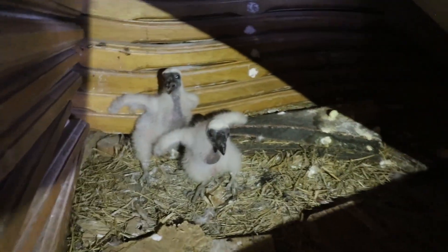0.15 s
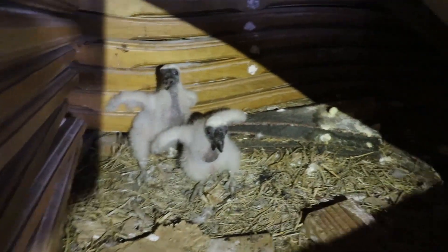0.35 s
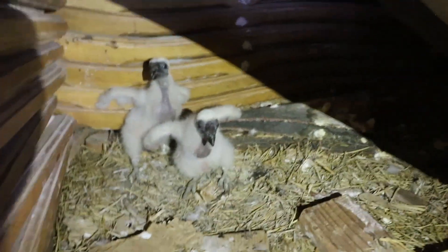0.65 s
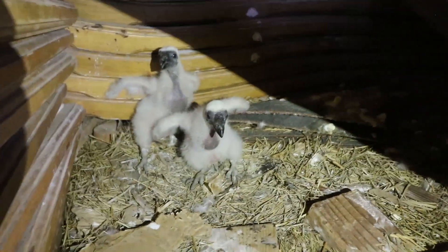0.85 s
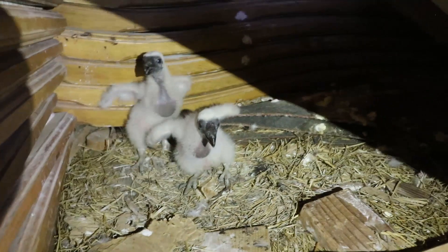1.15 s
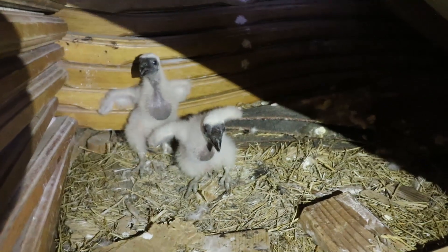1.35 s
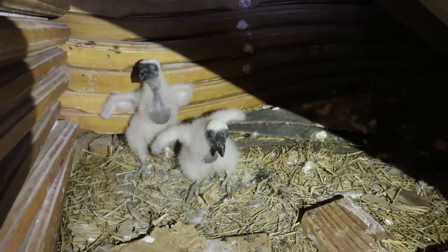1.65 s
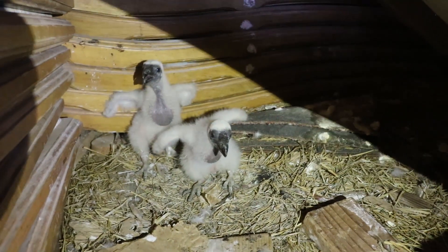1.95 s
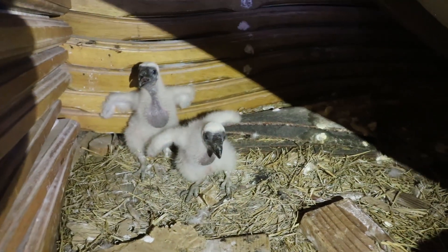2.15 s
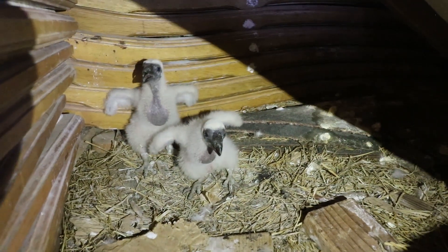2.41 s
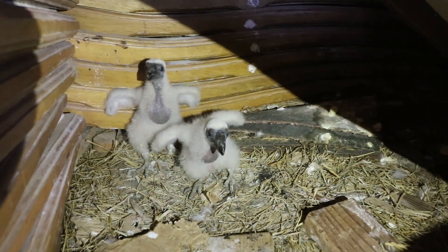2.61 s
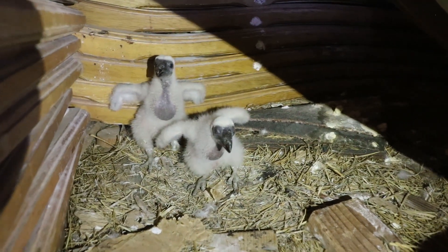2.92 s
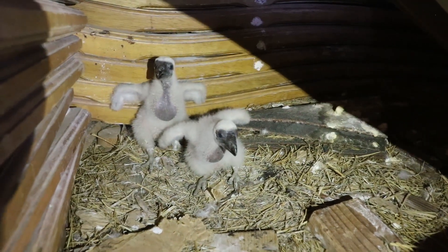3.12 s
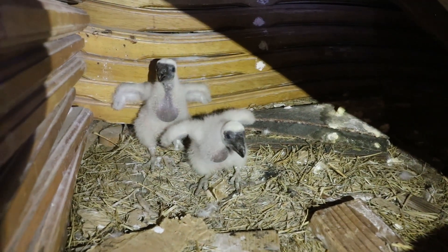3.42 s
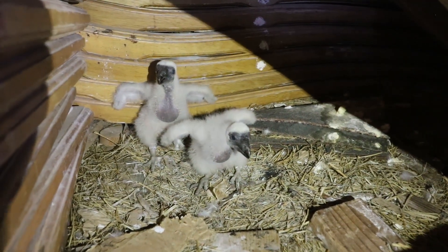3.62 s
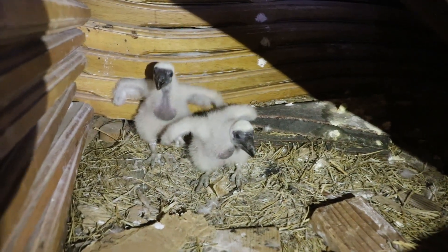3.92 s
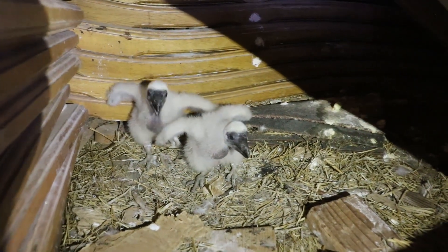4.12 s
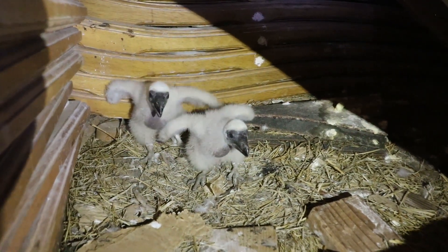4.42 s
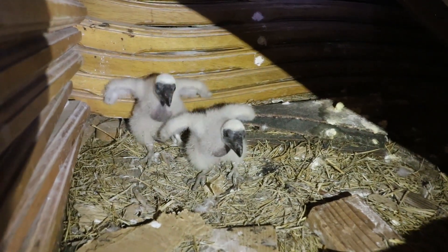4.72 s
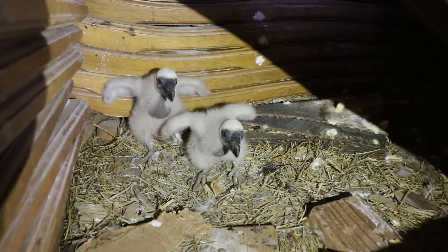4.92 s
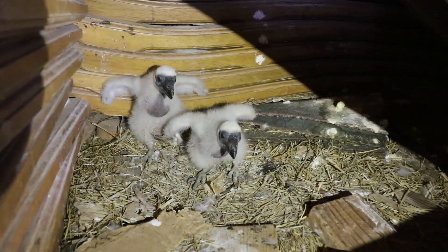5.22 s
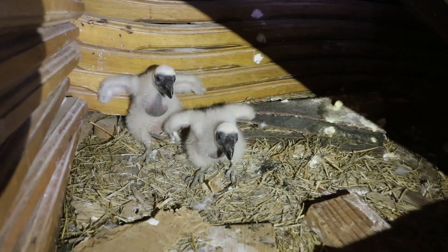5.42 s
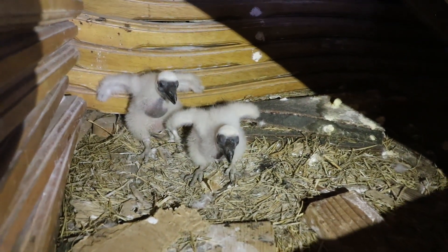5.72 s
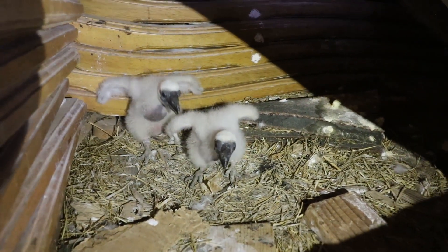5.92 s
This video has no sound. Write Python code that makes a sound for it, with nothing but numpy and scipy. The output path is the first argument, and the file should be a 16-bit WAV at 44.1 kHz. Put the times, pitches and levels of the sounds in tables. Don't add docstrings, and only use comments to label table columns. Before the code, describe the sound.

Long, raspy, airy hisses alternate between two young vultures, one softer and one stronger, over faint air noise, distant engine rumble and a few taps.

```python
import sys
import numpy as np
from scipy import signal
from scipy.fft import rfft, irfft, next_fast_len
from scipy.io import wavfile
from scipy.ndimage import map_coordinates

SR = 44100
rng = np.random.default_rng(int(sys.argv[2]) if len(sys.argv) > 2 else 0)


def voltage_ratio(decibels):
    exponent = np.asarray(decibels, float) / 20
    return 10 ** exponent


def bounce(signal):
    frames = np.transpose(np.atleast_2d(signal))
    limited = np.clip(frames, -1, 1)
    pcm = np.round(limited * 32767).astype(np.int16)
    wavfile.write(sys.argv[1], SR, pcm)


N = 266893

# (start [s], end [s], swell to full flow [s], fade at the end [s], beak jet [dB])
REAR_BREATHS = [
    (-.3, 1.136, 0.54, 0.59, -29.5),
    (1.62, 3.286, 0.76, 0.65, -29.5),
    (3.974, 5.33, 0.63, 0.53, -33.5),
]
FRONT_BREATHS = [
    (.585, 1.935, 0.65, 0.28, -24.5),
    (2.586, 3.986, 0.64, 0.21, -22),
    (4.699, 5.962, 0.58, 0.18, -23),
]
REAR_HABIT = dict(ease=1.37, tire_db_per_s=-2, pipe_db=-33.5, full_db=-27, pipe_power=0.53, shut_throat=0.87)
FRONT_HABIT = dict(ease=0.71, tire_db_per_s=3, pipe_db=-31, full_db=-20, pipe_power=0.24, shut_throat=0.6)
# (turn starts [s], turn ends [s], right ear lag [samples],
# rasp [0-1], throat size [about 1])
TURNS = [
    (.1, .5, -0.56, 0.8, 0.94),
    (2.049, 2.5, 0.15, 0.7, 0.97),
    (4.19, 4.6, -0.86, 0.84, 1.01),
    (1.122, 1.502, 0.94, 0.84, 0.95),
    (3.055, 3.807, 0.81, 0.69, 1),
    (5.2, 5.852, 0.73, 0.7, 0.99),
]
# (pitch [Hz], width [Hz], left [dB], right [dB])
REAR_PIPE = [
    [(424, 106, -1.5, -1), (750, 300, -1.5, 0), (1144, 192, 0.5, -1)],
    [(414, 128, -3.5, -1.5), (730, 450, 0, 0), (1122, 263, 0, -1)],
]
BOWED_PIPE = [
    [(407, 166, 6.2, 5.5), (675, 550, 1.9, 2.3), (1070, 234, 3.8, 4.6)],
    [(486, 240, 2.8, 2.8), (765, 530, 3.4, 3.7), (1084, 366, 1.9, 1.9)],
]
FRONT_PIPE = [
    [(431, 101, 0.5, 0.1), (786, 1010, -6.5, -5), (1277, 145, -1, -0.4)],
    [(430, 174, -0.5, 0.71), (735, 815, -4.5, -2.2), (1264, 140, -0.2, 0.54)],
]
# (pitch [Hz], width [Hz], left [dB], right [dB])
REAR_POSE_1 = [
    [(1800, 99, -24.5, -4), (2160, 3200, -33, -7), (3520, 1100, -4, 2.5), (4500, 530, -9, 0),
     (5830, 620, -2, -2), (6700, 660, 3.5, 2), (9230, 4300, -5.5, -7), (10100, 490, -12, -30),
     (10930, 503, -14.5, 4.5), (10860, 590, -3.5, 6), (12200, 680, -4, -8), (14160, 3200, -18, -19),
     (15390, 310, -13, -22)],
    [(1810, 70, -36, -25), (2140, 4400, -18, -9), (3420, 600, 0, 4), (4500, 390, -7, -1),
     (5530, 870, -1, -2), (6540, 390, 4, 3.5), (8500, 1200, -2.5, -3), (9770, 370, -9, -33),
     (10590, 830, 1, 2.5), (10620, 960, 2.5, 4), (11800, 620, 2, -3), (12430, 2770, -6.5, -12),
     (15430, 190, -3, -10.5)],
]
REAR_POSE_2 = [
    [(2340, 250, -30, -10), (3130, 730, 4.5, -15), (3280, 1000, 6.5, 2), (4920, 1670, 6.5, 6),
     (5190, 1430, 7.5, 4), (6860, 540, 4.5, 1), (8080, 270, 8.5, 0), (8220, 370, 4, 1), (9850, 290, -7, -4),
     (10970, 930, -6, -13), (12730, 390, -11, -3), (13600, 860, -6, -14), (15800, 170, -17, -17)],
    [(2240, 190, -11, -13), (3040, 920, 6, -14), (3190, 1050, 8, 1), (4770, 1450, 3.5, 7.5),
     (5140, 1900, 3.5, 5.5), (6850, 700, 4, 2.5), (8130, 650, 8.5, -1.5), (8270, 840, 7, -1.5),
     (9700, 1300, -5, -6), (11300, 1620, -5.5, -22), (12800, 470, -5, -6), (13430, 650, -8, -18),
     (15400, 360, -16, -14)],
]
REAR_POSE_3 = [
    [(2120, 380, -14, -7), (3050, 1500, -13, -2), (3290, 57, -2, 8.5), (4430, 1750, -8, -31),
     (5750, 370, -1.5, -5), (6150, 770, -11, -3), (8400, 420, -5, -7), (9110, 920, -21, -16),
     (10540, 70, -16, -27), (11630, 920, -10, -11), (12980, 1140, -23, -26), (13650, 590, -18, -13),
     (15900, 100, -18, -20)],
    [(2170, 530, -10, -2), (3230, 3000, -13, -3), (3250, 98, -7, 9), (4570, 1600, -3.5, -30),
     (5700, 390, 1.5, 3.5), (6760, 1700, -3, -0.5), (8300, 300, 4.5, 3), (8700, 600, -13, -8),
     (10440, 70, -11.5, -45), (11010, 1100, -7.5, -11), (12960, 1030, -10.5, -20), (13600, 430, -14, -17),
     (15900, 160, -21.5, -7)],
]
FRONT_POSE_1 = [
    [(1790, 62, -8, 0.5), (3160, 820, -10, -3.5), (3520, 420, -30, -1), (4800, 390, 0, -0.5),
     (5250, 440, -7.5, -3), (6430, 600, 1, -5), (8130, 320, -2, -2.5), (9000, 1800, -10, -16),
     (10660, 430, -4.5, -5.5), (12230, 600, -3.5, -9), (13270, 1050, -2, -3.5), (13420, 1100, -1, -3),
     (15500, 77, -13, -30)],
    [(1777, 40, 1, 8.5), (3230, 430, -17, 1.5), (3370, 180, -26, 2), (4988, 300, -2, 5),
     (5100, 135, -32, 0), (6330, 1000, 3, -7), (8540, 520, 1.5, -2.5), (10100, 1200, -4.5, -7.5),
     (10780, 450, -3, -12), (11100, 770, -0.5, -17), (13170, 1170, 8, -1.5), (13320, 1070, 8.5, -3.5),
     (15500, 120, -2, -42)],
]
FRONT_POSE_2 = [
    [(1697, 114, -8, -2.5), (3240, 1900, -7.5, -2), (3500, 280, 0.5, -6), (4710, 530, -3, -3.5),
     (5930, 680, 1, -4.5), (6270, 520, 5.5, -20), (7650, 2900, -9.5, -9), (8120, 270, 3.5, -3.5),
     (10400, 760, -2.5, -5), (11500, 600, -1.5, -9), (12400, 750, 0.5, -3.5), (13750, 500, -10, -14),
     (14800, 500, -12, -15), (8900, 300, -10, -6)],
    [(1740, 67, 1.5, 6.5), (2960, 5600, -6, -5), (3620, 270, 8, -6), (4400, 840, -9.5, -2.5),
     (5630, 600, 4, 1.5), (6430, 800, 3.5, -7), (8070, 2000, 5, 0.5), (8200, 650, 9, 1.5),
     (10300, 1000, -4, -2.5), (11460, 400, -3, -10), (12260, 590, -1, -7), (13700, 500, -9, -12),
     (14750, 600, -6, -14), (8700, 220, -2, -2)],
]
FRONT_POSE_3 = [
    [(1720, 76, -7, 0.5), (2230, 820, -2.5, -2), (3500, 1400, -0.5, -7), (5100, 480, 7.5, 5.5),
     (6370, 3300, 2.5, -36), (6370, 420, 11, -28), (7960, 560, -21, 3), (9780, 260, 4, -0.5),
     (10250, 297, -3, 0.5), (11500, 830, -1.5, -17), (12100, 420, -2, -2.5), (14700, 1160, -7, -10),
     (15000, 1310, -22.5, -30)],
    [(1700, 66, -10, -6), (2370, 1050, -5.5, -4), (3520, 880, 0.5, -3.5), (4920, 360, 3.5, 4),
     (6630, 2500, 0, -10), (6870, 590, 6, -8), (8050, 410, -0.5, 5), (10000, 540, 2, 1),
     (10270, 530, 0.5, 2), (11660, 550, -2.5, -12), (12100, 800, -5, -9), (15100, 630, -8, -14),
     (15270, 590, -15, -19)],
]
# (early pitch [Hz], late pitch [Hz], early width [Hz], late width [Hz], where it is heard)
REAR_DIPS = [
    [(2680, 2660, 200, 260, "both"), (4950, 5050, 220, 120, "both"), (8150, 7550, 190, 190, "sum"),
     (3910, 3960, 320, 420, "difference"), (6120, 5960, 320, 380, "difference"),
     (2810, 2860, 110, 240, "difference"), (10450, 10290, 160, 220, "sum"), (8750, 8750, 220, 200, "sum")],
    [(5120, 5020, 420, 210, "both"), (2760, 2730, 90, 140, "both"), (4060, 3990, 470, 380, "difference"),
     (5910, 5860, 330, 160, "difference"), (2960, 2940, 140, 160, "difference"),
     (8510, 8560, 110, 210, "sum"), (7900, 7900, 200, 200, "sum"), (14300, 14300, 400, 400, "sum")],
    [(10620, 10540, 210, 230, "both"), (12250, 12040, 210, 210, "sum"), (13310, 13320, 220, 220, "sum"),
     (6650, 6650, 200, 200, "sum"), (7600, 7600, 200, 200, "sum"), (3110, 3090, 140, 170, "sum"),
     (6030, 5950, 110, 190, "sum"), (4250, 4230, 550, 550, "difference"), (14310, 14290, 240, 240, "sum")],
]
FRONT_DIPS = [
    [(3700, 3650, 420, 220, "sum"), (3935, 3945, 140, 90, "both"), (3300, 3210, 110, 50, "left"),
     (3360, 3610, 150, 160, "right"), (5400, 5330, 60, 400, "sum"), (5810, 5890, 140, 280, "right"),
     (4140, 4210, 470, 420, "difference"), (2965, 2955, 170, 90, "difference"),
     (9650, 8830, 240, 230, "sum"), (14200, 14300, 400, 500, "sum"), (6900, 7050, 140, 330, "sum")],
    [(3945, 3995, 70, 110, "sum"), (3120, 3200, 50, 120, "sum"), (12940, 12950, 290, 190, "sum"),
     (11010, 11620, 220, 70, "sum"), (9260, 9240, 110, 160, "sum"), (2740, 2710, 200, 200, "difference"),
     (4160, 4120, 240, 90, "difference"), (6060, 6140, 35, 90, "sum"), (3560, 3540, 110, 45, "sum")],
    [(1500, 1510, 120, 160, "both"), (2875, 2790, 210, 260, "sum"), (3885, 3880, 260, 110, "sum"),
     (4120, 4165, 35, 260, "sum"), (8610, 8950, 310, 170, "sum"), (10740, 11250, 240, 220, "sum"),
     (6220, 6290, 160, 80, "sum"), (4390, 4600, 430, 210, "difference"), (13040, 13120, 170, 170, "sum"),
     (6760, 6510, 220, 220, "right")],
]
# (pitch [Hz], time to fall 60 dB [s])
BARN = [(300, 0.021), (2000, 0.061), (10000, 0.083)]
# (pitch [Hz], level per Hz [dB])
RUMBLE = [(13, -45), (22, -19), (64, 0), (119, -0.5), (205, -4), (260, -1), (340, -43), (570, -120)]
# (pitch [Hz], level per Hz [dB])
AIR = [(180, -53), (300, -14), (744, -14.5), (892, -12), (1140, -14), (1280, -18.5), (12500, -25.5),
       (15500, -26)]
# (time [s], peak [dB], ring pitch [Hz], time to fall 60 dB [s])
KNOCKS = [(.505, -25, 750, .03), (.61, -30, 500, .02), (.70, -38, 260, .05), (0.781, -36.5, 101, .15),
          (2.125, -28, 450, .02), (2.796, -31.5, 230, 0.063), (5.495, -13.5, 313, 0.032),
          (5.495, -30, 110, .06), (5.495, -11, 800, 0.005), (5.4947, -15, 2600, .009),
          (5.499, -21, 2300, .008), (5.4981, -17, 800, .02), (5.4994, -22, 1000, 0.015),
          (6.034, -46, 480, .04)]

PIPE_TOP_HZ = 1500
PIPE_SAG = 0.36
SPUTTER_DB = 8
DULL_GRAIN, BRIGHT_GRAIN, GRAIN_SPLIT_HZ = 0.57, 1.24, 7500
PIPE_ECHO_DB, STRAW_DB = -11, -9
TREMBLE_HZ, TREMBLE_FILL = 3.1, .07
RUMBLE_DB, RECEDING_DB, RECEDES_S = -55, 4, 0.95
MIC_DIP_HZ, MIC_DIP_WIDTH_HZ, TOP_HZ = 15150, 300, 15790


def unit(x):
    return x / np.sqrt(np.mean(x ** 2) + 1e-20)


def along(points, hz):
    f, v = np.transpose(points)
    return np.interp(np.log(hz + 1), np.log(f + 1), v)


def wobble(rate, size):
    points = rng.standard_normal(int(size * rate / SR) + 4)
    return map_coordinates(points, [np.arange(size) * rate / SR])


def breath(row, ease, tire_db_per_s, pipe_db, full_db, pipe_power, shut_throat):
    start, end, swell_s, fade_s, jet_db = row
    s = np.arange(max(start, 0), end, 1 / 200)
    swell_and_fade = np.clip([(s - start) / swell_s, (s[-1] - s) / fade_s], 0, 1)
    flow = np.sin(np.pi / 2 * swell_and_fade).prod(0) ** ease
    tiring_db = tire_db_per_s * np.clip(s - start - swell_s, 0, None)
    jet_db = jet_db + 20 * np.log10(flow + 1e-4) - tiring_db
    windpipe_db = pipe_db + pipe_power * (jet_db - full_db)
    opening = shut_throat + (1 - shut_throat) * np.sqrt(flow)
    return np.transpose([s, windpipe_db, jet_db, opening])


def flutter(size, slow_db, fast_db, grain_db):
    surges = slow_db * wobble(11.96, size)
    eddies = fast_db * wobble(119.2, size)
    grain = grain_db * np.clip(wobble(2500, size), -2.6, 2.6)
    return voltage_ratio(surges + eddies + grain)


def close_walls(x, wall_db, t60):
    t = np.arange(SR // 60) / SR
    sway = np.linspace(0, np.pi / 2, x.shape[1])
    echo = rng.standard_normal((2, 2, len(t))) * voltage_ratio(-60 * t / t60) * (t > .0005)
    echo *= voltage_ratio(wall_db) / np.linalg.norm(echo, axis=2, keepdims=True)
    before, after = signal.fftconvolve(x[None], echo, axes=2)[..., :x.shape[1]]
    return x + np.cos(sway) * before + np.sin(sway) * after


def resonance(f, pitch, width):
    return 1j * f * width / (pitch * pitch - f * f + 1j * f * width)


def cancelled(pair, f, t, turn, dips):
    keep = dict.fromkeys(["both", "left", "right", "sum", "difference"], 1)
    for early_hz, late_hz, early_width_hz, late_width_hz, where in dips:
        pitch = early_hz + (late_hz - early_hz) * turn
        width = early_width_hz + (late_width_hz - early_width_hz) * turn
        depth = .99 - TREMBLE_FILL * np.sin(np.pi * TREMBLE_HZ * t + early_hz) ** 2
        keep[where] = keep[where] * (1 - depth * resonance(f, pitch, width))
    left = pair[0] * keep["left"] * keep["both"]
    right = pair[1] * keep["right"] * keep["both"]
    alike = (left + right) / 2 * keep["sum"]
    opposite = (left - right) / 2 * keep["difference"]
    return np.array([alike + opposite, alike - opposite])


def hiss(breath_curve, poses, dips, turn_s, right_lag, rasp, throat_size):
    s, pipe_db, jet_db, opening = np.transpose(breath_curve)
    start = round(s[0] * SR)
    size = min(round(s[-1] * SR), N) - start
    seconds = s[0] + np.arange(size) / SR
    out = np.zeros((2, N))
    shut = 1 - np.interp(seconds, s, opening)
    air = rng.standard_normal(size) * voltage_ratio(SPUTTER_DB * shut * wobble(170, size))

    frames = dict(nperseg=1024, noverlap=672)
    f = np.fft.rfftfreq(1024, 1 / SR)[:, None]
    t = s[0] + signal.stft(air, SR, **frames)[1]
    turn = np.interp(t, turn_s, [0, 1])
    throat = np.clip(throat_size * np.interp(t, s, opening), .4, 1.2)
    early, late = np.array(poses, float)[..., None]
    modes = early + (late - early) * turn
    modes[0, 0] *= throat
    modes[1:3, 0] *= throat ** PIPE_SAG
    modes[3, 2:] += 40 * np.log10(throat)

    beak = 1 / np.sqrt(1 + (345 * throat / (f + 1)) ** 8)
    lags = np.array([0, right_lag])[:, None, None]
    path = beak * np.exp(-2j * np.pi * f * lags / SR)
    windpipe = (pipe_db, True, 0.31 * rasp, PIPE_ECHO_DB)
    beak_jet = (jet_db, False, rasp, STRAW_DB)
    for level_db, in_pipe, rough, wall_db in (windpipe, beak_jet):
        tract = np.zeros((2, len(f), len(t)), np.complex64)
        for k, (pitch, width, *ears_db) in enumerate(modes):
            if (pitch[0] < PIPE_TOP_HZ) == in_pipe:
                tract += (-1) ** k * voltage_ratio(ears_db)[:, None] * resonance(f, pitch, width)
        tract *= path / np.linalg.norm((tract * path).mean(0), axis=0)

        gain = flutter(size, 0.32 * rough, 0.5 * rough, 3.12 * rough)
        dull, bright = unit(air * gain ** DULL_GRAIN), unit(air * gain ** BRIGHT_GRAIN)
        body_filter = signal.butter(2, GRAIN_SPLIT_HZ, fs=SR, output="sos")
        stream = bright + signal.sosfilt(body_filter, dull - bright)
        echoed = close_walls(np.array([stream, stream]), wall_db, t60=0.023)
        voiced = signal.stft(echoed, **{"fs": SR}, **frames)[2] * tract
        pair = signal.istft(cancelled(voiced, f, t, turn, dips), SR, **frames)[1][:, :size]
        out[:, start:start + size] += unit(pair) * voltage_ratio(np.interp(seconds, s, level_db))
    return out


def chicks():
    breaths = [breath(row, **REAR_HABIT) for row in REAR_BREATHS]
    breaths += [breath(row, **FRONT_HABIT) for row in FRONT_BREATHS]
    pipes = [REAR_PIPE, REAR_PIPE, BOWED_PIPE, FRONT_PIPE, FRONT_PIPE, FRONT_PIPE]
    beaks = [REAR_POSE_1, REAR_POSE_2, REAR_POSE_3, FRONT_POSE_1, FRONT_POSE_2, FRONT_POSE_3]
    dip_lists = [*REAR_DIPS, *FRONT_DIPS]
    both_birds = np.zeros((2, N))
    for curve, pipe, beak, dips, turn in zip(breaths, pipes, beaks, dip_lists, TURNS):
        poses = np.concatenate([pipe, beak], axis=1)
        both_birds += hiss(curve, poses, dips, turn[:2], *turn[2:])
    return both_birds


def barn(x):
    hz, t, z = signal.stft(rng.standard_normal((2, SR // 2)), SR, nperseg=256)
    tail = signal.istft(z * voltage_ratio(-60 * t / along(BARN, hz)[:, None]), SR, nperseg=256)[1]
    tail = tail / np.linalg.norm(tail[0])
    return signal.fftconvolve(x.mean(0)[None], tail, axes=1)[:, :N]


def coloured(spectrum, alike):
    m = next_fast_len(N + 8192)
    gain = voltage_ratio(along(spectrum, np.fft.rfftfreq(m, 1 / SR)))
    a, b = irfft(rfft(rng.standard_normal((2, m))) * gain, m)[:, :N]
    spread = np.arccos(np.clip(alike, -1, 1)) / 2
    middle, side = np.cos(spread) * a, np.sin(spread) * b
    return unit(np.array([middle + side, middle - side]))


def background():
    receding_db = RECEDING_DB * np.exp(-np.arange(N) / SR / RECEDES_S)
    rumble_db = RUMBLE_DB + receding_db + wobble(5.4, N)
    rumble = voltage_ratio(rumble_db) * coloured(RUMBLE, alike=.68)
    return rumble + voltage_ratio(-53.5) * coloured(AIR, alike=0.54)


def knocks():
    both, shell = np.zeros(N + SR), np.zeros(N + SR)
    lead = SR // 500
    t = np.arange(-lead, SR // 5) / SR
    for s, db, hz, t60 in KNOCKS:
        pull = -.95 * (min(hz, 900) / 900) * np.exp(-((t + .0003) / .0002) ** 2)
        ring = np.sin(2 * np.pi * hz * t) * voltage_ratio(-60 * t / t60) * (t > 0)
        rattle = rng.standard_normal(len(t)) * voltage_ratio(-60 * t / .03) * (t > -.0008)
        rattle *= hz > 150
        first = round(s * SR) - lead
        both[first:][:len(t)] += voltage_ratio(db) * (pull + ring)
        shell[first:][:len(t)] += voltage_ratio(db - 2) * rattle
    both = signal.sosfilt(signal.butter(2, 60, "high", fs=SR, output="sos"), both[:N])
    shell = signal.sosfilt(signal.butter(2, [300, 3000], "band", fs=SR, output="sos"), shell[:N])
    return np.array([.7 * both + shell, 1.3 * both - .5 * shell])


def scene():
    near = chicks() + knocks()
    return near + voltage_ratio(-24) * barn(near) + background()


def roll_off(x):
    return signal.sosfilt(signal.butter(12, 16110, fs=SR, output="sos"), x)


def record(dry):
    m = next_fast_len(N + 8192)
    f = np.fft.rfftfreq(m, 1 / SR)
    port = 1 - .9 / (1 + (2 * (f - MIC_DIP_HZ) / MIC_DIP_WIDTH_HZ) ** 2)
    heard = irfft(rfft(dry, m) * port * (f < TOP_HZ), m)[:, :N]
    return roll_off(heard)


dry = scene()
out = record(dry)
bounce(out)
```